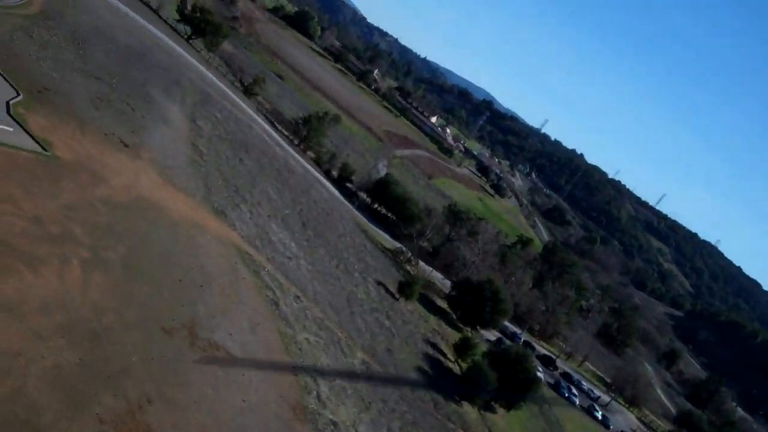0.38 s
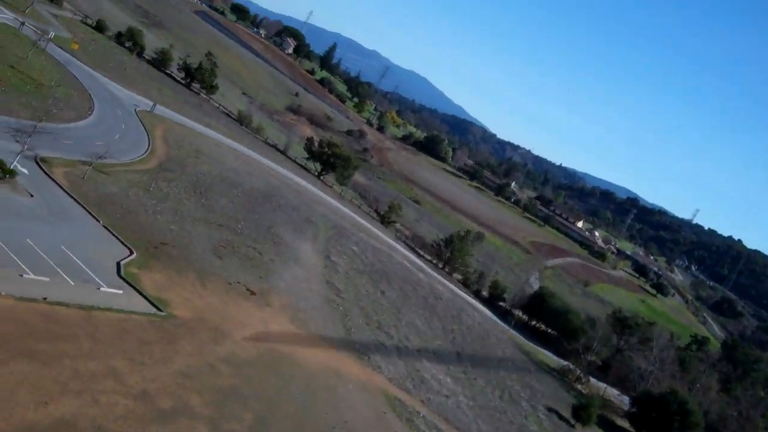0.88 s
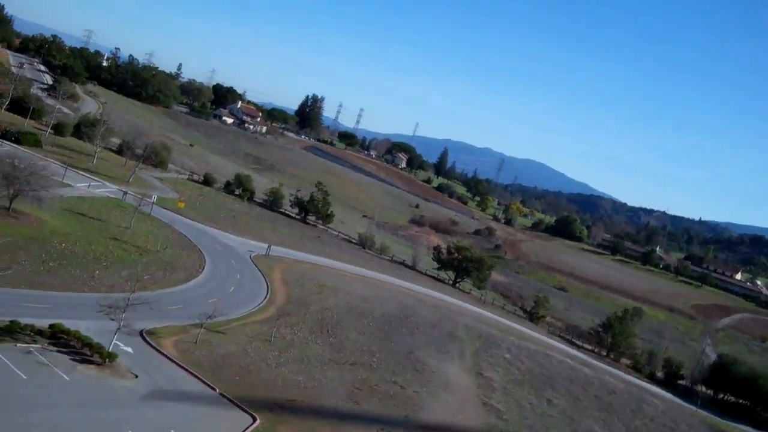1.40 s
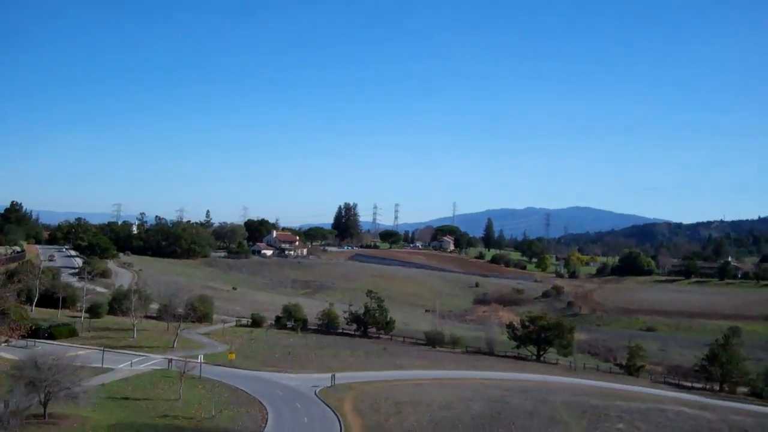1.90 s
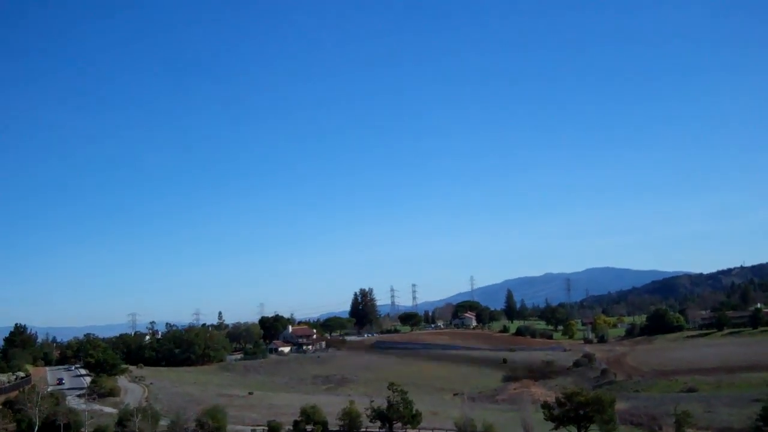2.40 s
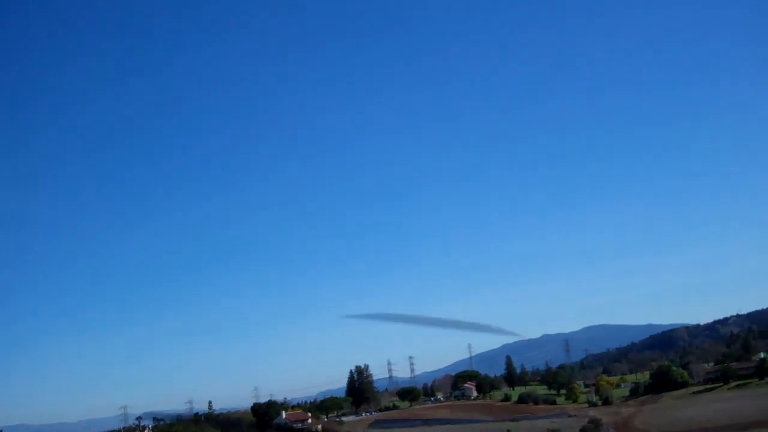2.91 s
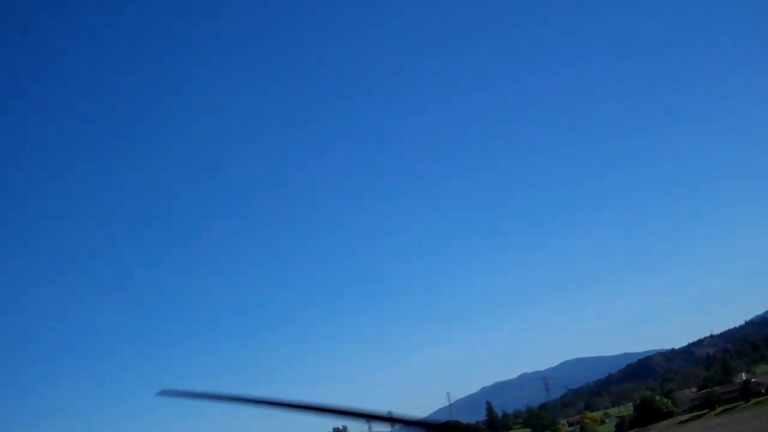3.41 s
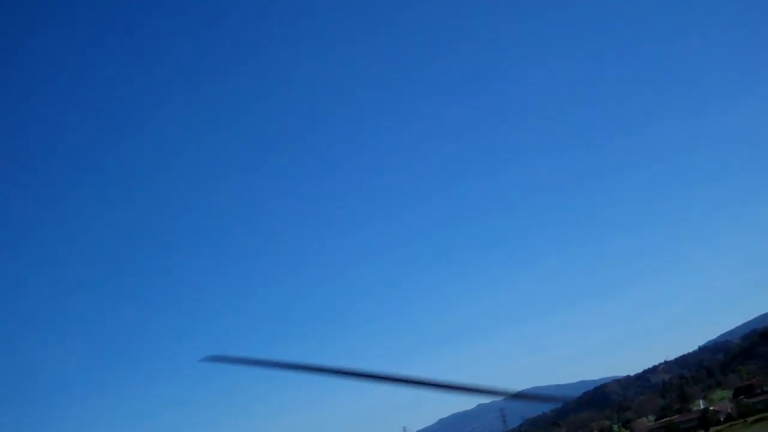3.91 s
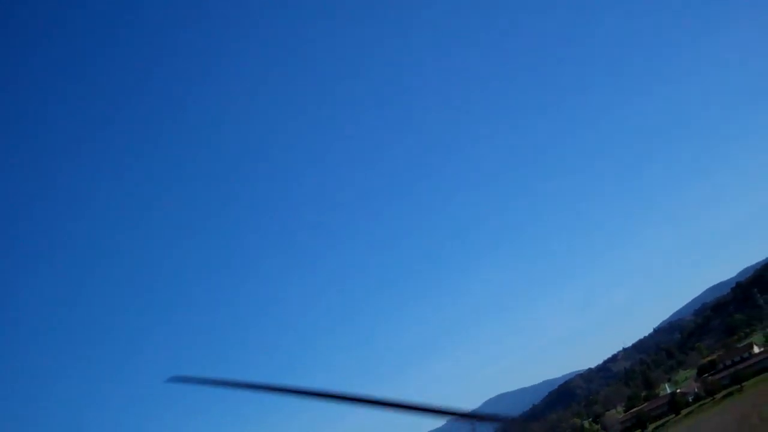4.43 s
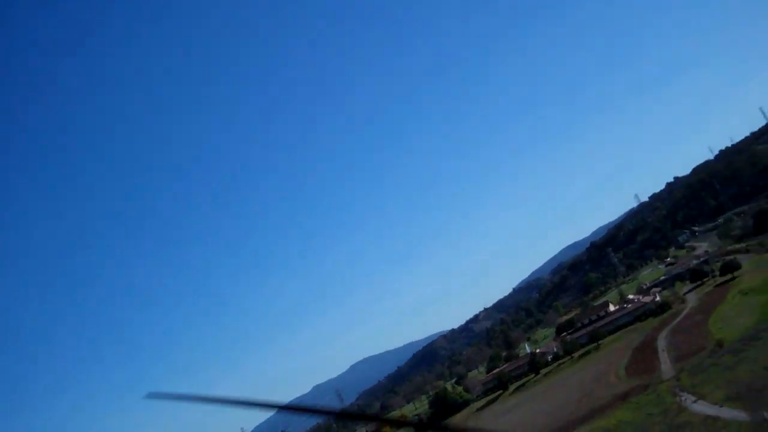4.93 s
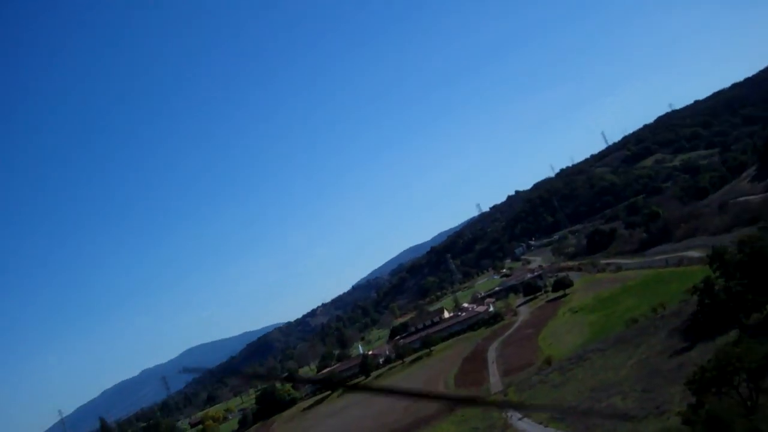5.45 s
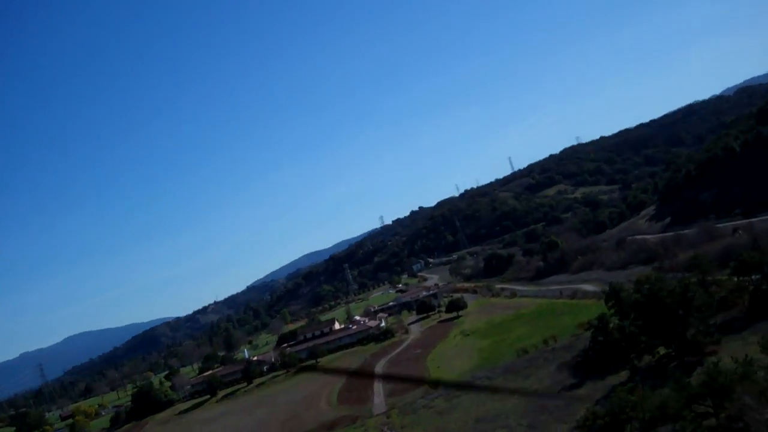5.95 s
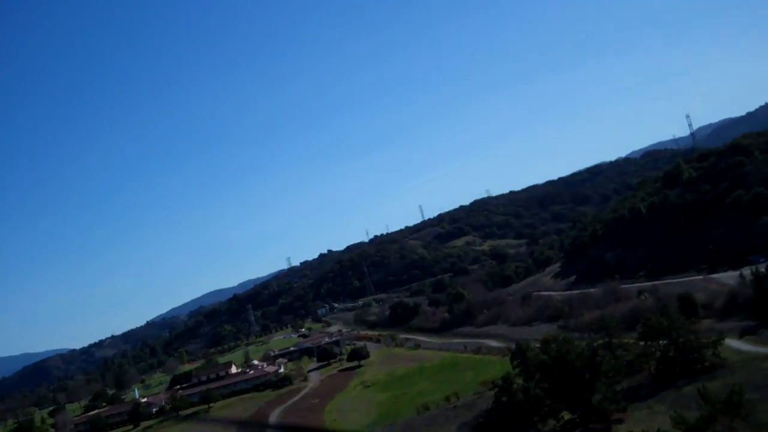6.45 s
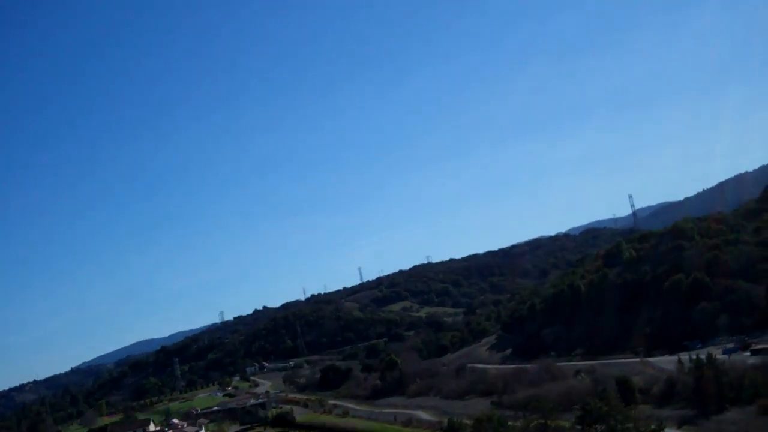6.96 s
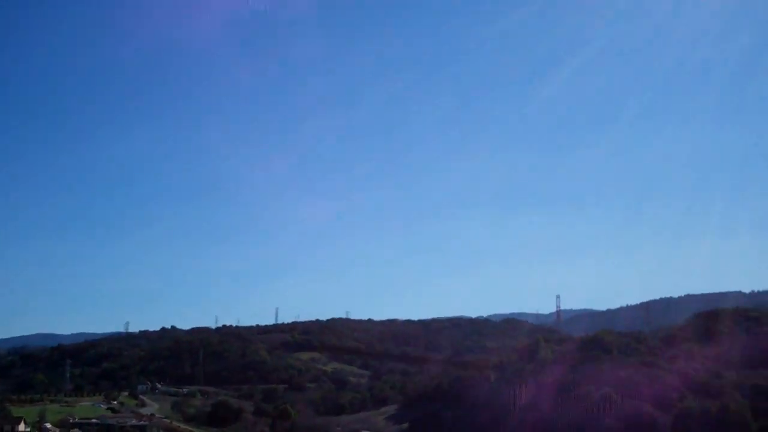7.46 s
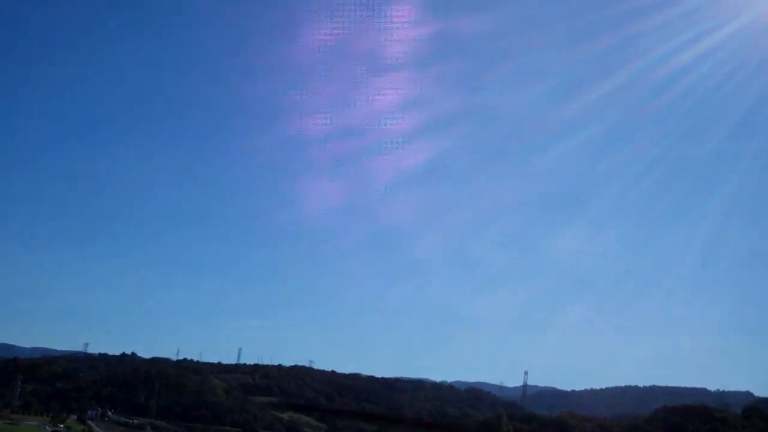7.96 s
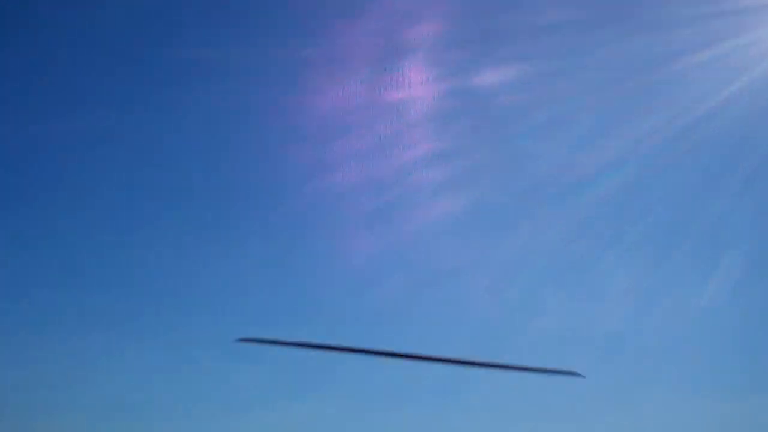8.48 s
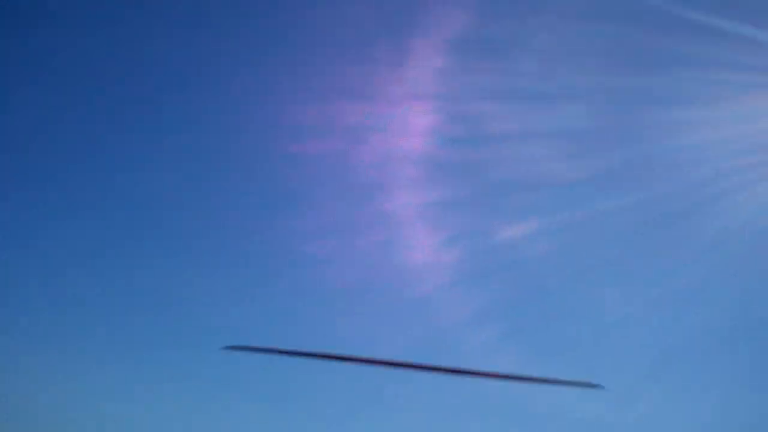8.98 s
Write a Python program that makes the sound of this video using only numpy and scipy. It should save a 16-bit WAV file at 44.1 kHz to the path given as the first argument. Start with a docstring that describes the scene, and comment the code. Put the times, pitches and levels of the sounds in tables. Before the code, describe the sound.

A small electric propeller buzzes harshly right at the microphone, roughened by gusts of wind, then steps up to a higher, cleaner, steady rasp.

```python
"""The two-blade propeller of an electric model plane buzzes in front of two microphones in its slipstream.
The stream presses both membranes against their limit; each blade wake sucks them across to the other limit
for a moment. Side gusts in the turn lower the pressure and stir eddies and whistling; rough air adds more.
Then the throttle opens and the buzz steps up. Shaped noise makes the eddies, vortices, whistle and hiss."""
import sys
import numpy as np
from scipy import signal
from scipy.fft import rfft, irfft, next_fast_len
from scipy.io import wavfile
from scipy.ndimage import map_coordinates

SR = 44100
rng = np.random.default_rng(int(sys.argv[2]) if len(sys.argv) > 2 else 0)


def pcm_store(signal):
    """Save signal as 16-bit PCM."""
    levels = np.round(np.clip(np.atleast_2d(signal), -1, 1) * 32767)
    wavfile.write(sys.argv[1], SR, levels.astype(np.int16).T)


def nominal_scale(level):
    """Amplitude ratio for a level in decibels (scalar or array-like)."""
    x = np.asarray(level, float) / 20
    return 10 ** x


N = 401751

# usual blade wake, one row for the left port and one for the right: bow_push_limits, push_ms, front_ms,
# suction_limits, end_abruptness (exponent), late_sag_limits, delay_ms
BLADE_WAKE = [(3.2, 0.4, 0.096, 4.89, 3.8, 0.77, 0.02), (1.65, 0.11, .12, 4.91, 2.07, 1.68, -0.037)]


def curves(rows):
    """Breakpoints joined by straight lines: one value per sample for each column after the time."""
    s, *cols = np.transpose(rows)
    return [np.interp(np.arange(N) / SR, s, c) for c in cols]


def filtered(x, response):
    """x shaped by a complex response of frequency."""
    m = next_fast_len(N + 8192)
    return irfft(rfft(x, m) * response(np.fft.rfftfreq(m, 1 / SR)), m)[..., :N]


def noise(spectrum, alike):
    """Two coloured noises with a common part (alike 0-1), together scaled to rms 1."""
    f, db = np.transpose(spectrum)
    white = rng.standard_normal((3, N))
    share = np.clip(alike, 0, 1)
    pair = np.sqrt(share) * white[0] + np.sqrt(1 - share) * white[1:]
    pair = filtered(pair, lambda hz: nominal_scale(np.interp(np.log(hz + 1), np.log(f), db)))
    return pair / pair.std()


def wobble(rate):
    """Two smooth random curves through rate random knots a second."""
    knots = rng.standard_normal((2, int(N * rate / SR) + 4))
    position = np.arange(N) * rate / SR
    return np.array([map_coordinates(k, [position]) for k in knots])


def spells(rows, edge_s):
    """Sum of trapezoids with ramps centred on start and end, one output per column after start and length."""
    start, length, *cols = np.transpose(rows)
    t = np.arange(N)[:, None] / SR
    inside = np.minimum(t - start, start + length - t)
    on = np.clip(inside / edge_s + .5, 0, 1)
    return np.array(cols) @ on.T


def blade_clock(jitter_ms, own_ms):
    """Timing of the passing blades at each port: number of the last pass, ms since it, ms until the next."""
    # propeller speed: time_s, pass_rate_hz
    blade_rate = [(0.02, 233.5), (0.6, 234.9), (1.0, 234.3), (1.48, 236.4), (1.55, 235.2), (1.96, 236.7),
                  (2.74, 235.1), (3.39, 231.8), (4.39, 229.6), (4.62, 233.0), (4.72, 236.4), (4.87, 254.3),
                  (4.92, 257.6), (5.07, 258.6), (6.08, 258.9), (6.13, 259.6), (8.09, 259.6), (8.19, 258.4),
                  (8.97, 257.9), (9.05, 256.7)]
    stray_db = 5.5  # spread of the timing scatter
    turns = np.cumsum(curves(blade_rate)[0]) / SR  # blade passes so far
    whole = np.arange(int(turns[-1]) + 1)
    now = np.arange(N) * 1000 / SR
    luck = rng.standard_normal((len(whole), 4))
    luck = luck * nominal_scale(stray_db * luck[:, 3:])  # most wakes come on time, a few stray far
    clocks = []
    for port, wake in enumerate(BLADE_WAKE):
        passes = np.interp(whole + .5, turns, now) + wake[-1]
        passes = passes + jitter_ms * luck[:, 0] + own_ms * luck[:, 1 + port]
        passes = np.r_[passes[0] - 4.3, passes, passes[-1] + 3.9]  # one more pass at either end
        k = np.clip(np.searchsorted(passes, now) - 1, 0, len(passes) - 2)
        since = np.maximum(now - passes[k], 0)
        until = np.maximum(passes[k + 1] - now, 0)
        clocks.append((k, since, until))
    return clocks


def vortex_rebound(port, since, size):
    """Push of a tip vortex that crosses the port just after the suction begins."""
    # usual rebound, left and right port: delay_ms, width_ms, push_limits, spread_db
    rebound_shape = [(0.42, 0.033, 0.11, 7), (0.33, 0.091, 0.47, 8.5)]
    delay_ms, width_ms, push, spread_db = rebound_shape[port]
    return push * nominal_scale(spread_db * size) * np.exp(-((since - delay_ms) / width_ms) ** 2)


def shed_vortices():
    """Noise of small vortices tumbling in the wake, unsteady in level."""
    # relative spectrum: frequency_hz, density_db (per Hz)
    shed_spectrum = [(500, -6), (1500, -10), (3000, -10), (5500, -9), (8000, 0), (15000, -22)]
    return nominal_scale([[-13], [-6.5]] + 5.3 * wobble(110)) * noise(shed_spectrum, alike=0.069)


def edge_whistle(whistle_db):
    """Noise of air whistling across the port edge, with a flickering level."""
    # relative spectrum: frequency_hz, density_db (per Hz)
    whistle_spectrum = [(2000, 4), (5000, -4), (7500, -6), (9300, 6.5), (11000, -1), (15000, -48)]
    return nominal_scale(whistle_db + [[.8], [-3]] + 0.97 * wobble(90)) * noise(whistle_spectrum, alike=0.043)


def wakes(wake_ms, whistle_db):
    """A bow push, a sudden suction that holds and lets go, a rebound, vortices and a whistle at every pass."""
    # scatter of the wake length from pass to pass, left and right: scatter_db
    uneven_length_db = [1, 0.82]
    vortices, whistle = shed_vortices(), edge_whistle(whistle_db)
    wavering = nominal_scale(0.46 * wobble(45))  # the wake length drifts over a few passes
    out = []
    for port, (k, since, until) in enumerate(blade_clock(jitter_ms=0.026, own_ms=0.018)):
        push, push_ms, front_ms, suction, abrupt, sag, _ = BLADE_WAKE[port]
        size = rng.standard_normal((k[-1] + 1, 4))[k].T  # new at every pass
        front = np.exp(-(since / (front_ms * nominal_scale(1.19 * size[2]))) ** 2)
        bow = push * (np.exp(-(until / push_ms) ** 2) + front)
        length = wake_ms[port] * wavering[port] * nominal_scale(uneven_length_db[port] * size[1])
        trough = suction * nominal_scale(0.52 * size[0]) * np.exp(-(since / length) ** abrupt)
        lingering = 0.54 * np.exp(-since / 0.69)  # the last of the suction drains slowly
        fading = sag * (since / (since + until)) ** 3  # pressure sags until the next blade arrives
        stirred = np.exp(-since / 0.82) + np.exp(-until / 0.03)
        fine = np.exp(-since / 0.74) * vortices[port] + stirred * whistle[port]
        rebound = vortex_rebound(port, since, size[3])
        out.append(bow - (trough + lingering) * (1 - front) - fading + rebound + fine)
    return np.array(out)


def eddies(eddy_db):
    """Lumpy noise of eddies carried past the ports; the left port is more sheltered."""
    # relative spectrum: frequency_hz, density_db (per Hz)
    eddy_spectrum = [(20, 16.5), (100, 6.5), (300, -2.5), (800, -14), (2000, -19.5), (5000, -31.5),
                     (9000, -24), (15000, -45)]
    lumps = nominal_scale(2.5 * wobble(14))
    return nominal_scale(eddy_db + [[-5], [-2.5]]) * lumps * noise(eddy_spectrum, alike=0.38)


def rough_air():
    """Strength of the patches of rough air, which comes and goes within a patch."""
    # patches: start_s, length_s, usual_strength (0-1)
    rough_patches = [(0.26, 0.14, 0.4), (0.42, 0.32, 0.58), (0.96, 0.49, 0.63), (1.76, 0.046, 0.66),
                     (1.96, 0.122, 0.6), (2.12, 0.41, 0.58), (2.6, 0.18, .45), (3.39, 0.047, 0.44),
                     (4.22, 0.016, 0.3), (4.565, 0.013, 0.3), (3.81, 0.024, 0), (5.63, 0.036, 0),
                     (9.04, 0.042, 0.2)]
    return spells(rough_patches, edge_s=0.048) * nominal_scale(1.2 * wobble(9.1)[:1])


def side_gusts():
    """Pressure lost, left and right, as side gusts tear the slipstream off the ports."""
    # gusts, adding up where they overlap: start_s, length_s, left_loss_limits, right_loss_limits
    gust_spells = [(1.6, 0.16, 2.6, 2.0), (1.638, 0.12, 2.1, 1.3), (1.812, 0.15, 2.4, 1.9),
                   (1.812, 0.12, 2.1, 1.3)]
    return spells(gust_spells, edge_s=0.018)


def scene():
    """Pressure at the two ports, in membrane limits: steady slipstream, drift, eddies and blade wakes."""
    # the turn ends, the climb slows the plane, the throttle opens; before rough air, gusts and scatter:
    # time_s, left_wake_ms, right_wake_ms, eddy_db (before the trim of each port)
    slipstream = [(0.0, 1.7, 2.3, -3), (0.8, 1.64, 2.0, -2), (1.55, 1.5, 2.08, -0.5), (2.9, 1.95, 2.26, 0),
                  (3.5, 1.76, 1.97, 2), (3.9, 1.7, 2.7, -20), (4.15, 1.1, 2.05, -18), (4.5, 1.1, 2.05, -7),
                  (4.65, 1.07, 0.98, -7), (4.8, 1.1, 2, -10), (5.0, 0.84, 1.57, -8), (5.5, 0.86, 1.54, -15),
                  (9.11, 0.77, 1.59, -5)]
    left_ms, right_ms, eddy_db = curves(slipstream)
    rough, torn = rough_air(), side_gusts()
    gusty = np.clip(torn[1], 0, 1)

    # steady pressure in limits, left and right; the left one gains 0.84 limits per ms of wake
    pressure = [[2.35], [2.69]] + [[0.84], [0]] * left_ms
    pressure = pressure - [[0.37], [1.54]] * rough - torn
    wake_ms = np.array([left_ms, right_ms]) + [[0.91], [-0.57]] * rough + [[0.026], [-0.62]] * gusty
    eddy_db = eddy_db + 10.5 * rough + 6.5 * gusty
    whistle_db = -5.5 + 18.5 * rough[0] + 19 * gusty
    drift = 0.2 * wobble(25)
    return pressure + drift + eddies(eddy_db) + wakes(wake_ms, whistle_db)


def membranes(pressure):
    """The membranes saturate, softly under pressure and hard under suction."""
    knee = np.where(pressure > 0, 1.8, 8)
    yielding = 0.018 * np.tanh(np.minimum(pressure, 0) / 2)  # the suction limit gives a little
    clipped = pressure / (1 + np.abs(pressure) ** knee) ** (1 / knee) + yielding
    return clipped - 1  # the pressed-in limit becomes zero


def preamp_hiss():
    """Rumble and hiss of the overdriven preamplifier, unsteady in level."""
    # relative spectrum: frequency_hz, density_db (per Hz)
    hiss_spectrum = [(20, 7), (60, 12), (300, -22), (1500, -63), (4000, -0.5), (9000, -4), (12000, 1),
                     (15000, -24)]
    return nominal_scale(-29.5 + 1.9 * wobble(30)) * noise(hiss_spectrum, alike=0.09)


def port_and_coupling(x):
    """The port cavity resonates broadly and rolls off; a coupling capacitor lets each step decay."""
    # port cavity: resonance_hz, width_hz, rolloff_hz
    port_cavity = (7110, 9070, 7900)
    peak_hz, width_hz, top_hz = port_cavity

    def response(hz):
        coupling = 1j * hz / (590 + 1j * hz) * 1j * hz / (15 + 1j * hz)
        resonance = peak_hz ** 2 / (peak_hz ** 2 - hz ** 2 + 1j * hz * width_hz)
        return coupling * resonance / (1 + 1j * hz / top_hz) ** 2

    return filtered(x, response)


def top_cut(x):
    """Nothing passes above the cut-off."""
    return signal.sosfilt(signal.butter(12, 15290, fs=SR, output="sos"), x)


def record(dry):
    """Pressure becomes sound: saturating membranes, preamplifier noise, port and coupling, then level."""
    # half the swing between the two limits, ahead of port and coupling, left and right: level_db
    half_swing_db = [
        [-14.5],
        [-15],
    ]
    noisy = membranes(dry) + preamp_hiss()
    mix = nominal_scale(half_swing_db) * port_and_coupling(noisy)
    return top_cut(mix)


dry = scene()
out = record(dry)
pcm_store(out)
```